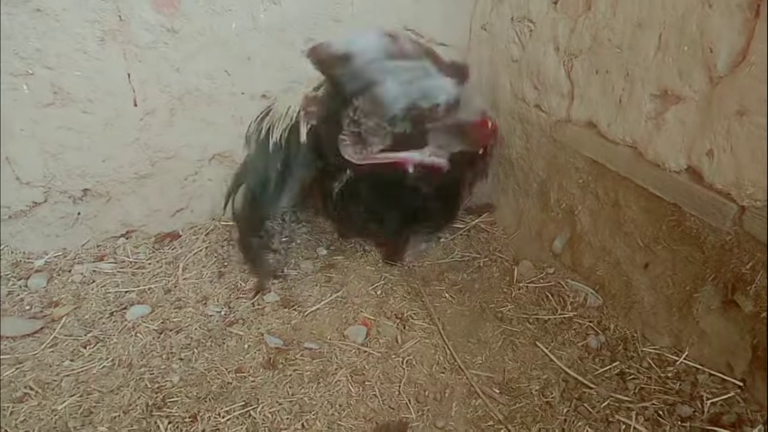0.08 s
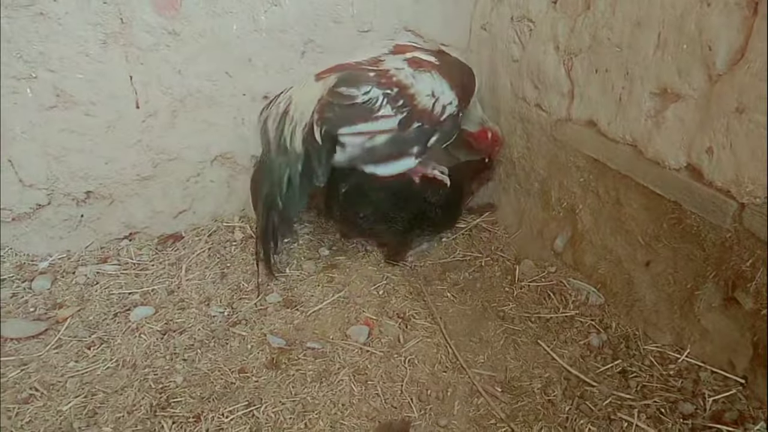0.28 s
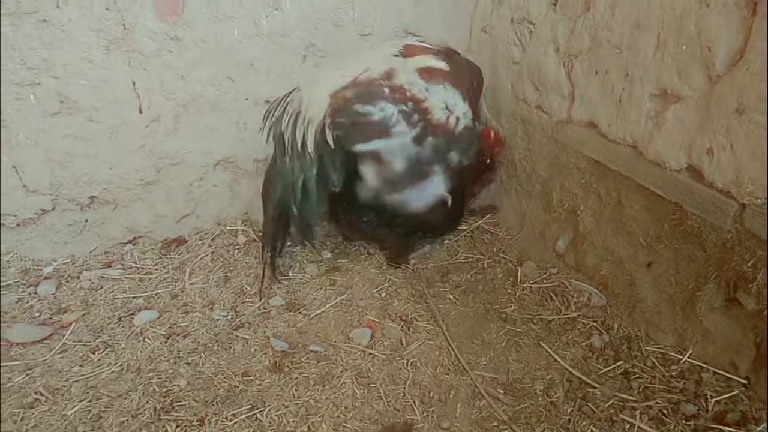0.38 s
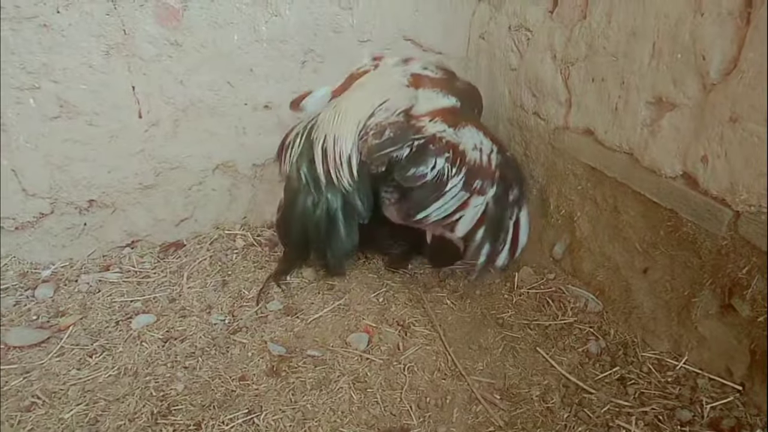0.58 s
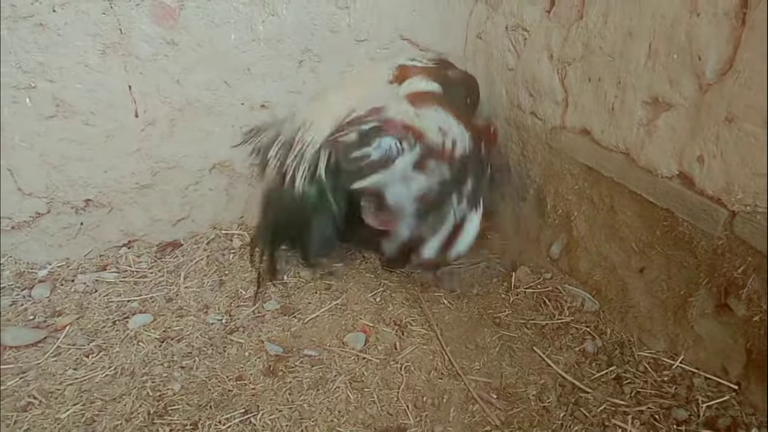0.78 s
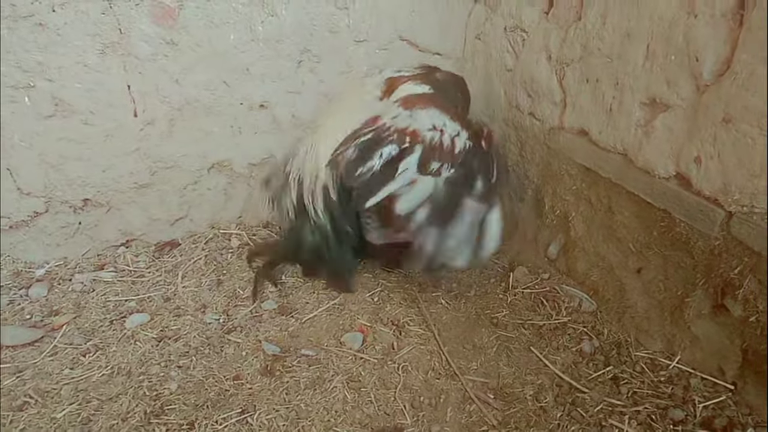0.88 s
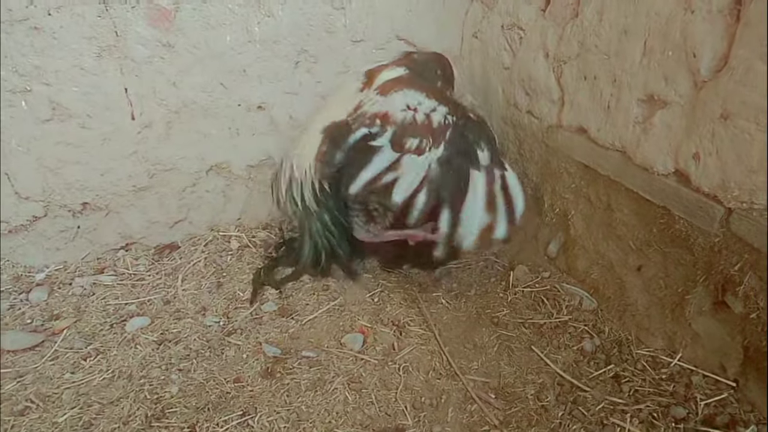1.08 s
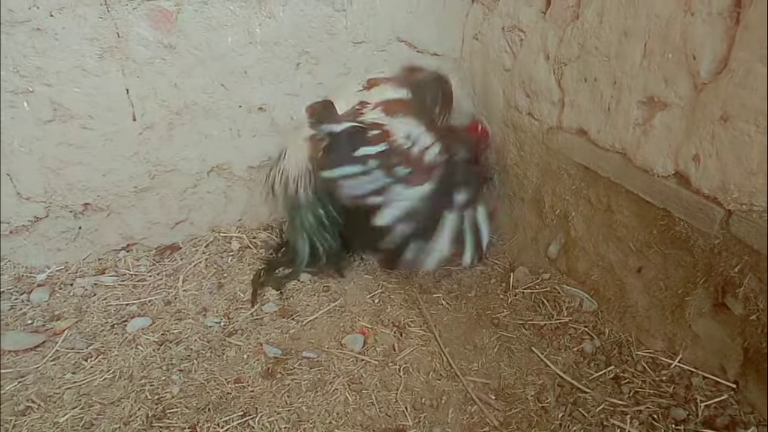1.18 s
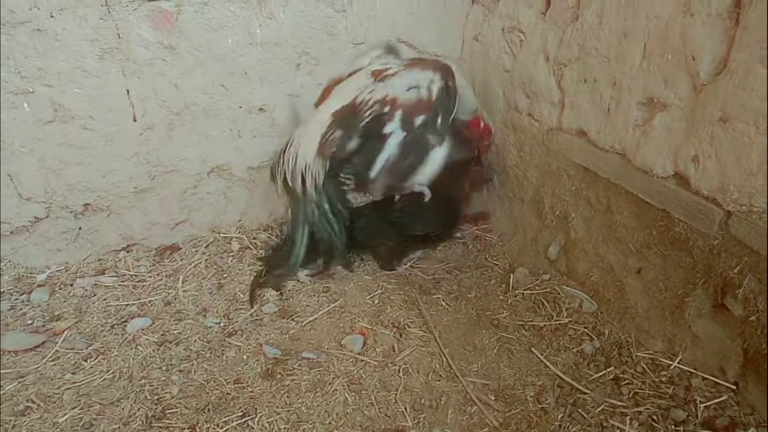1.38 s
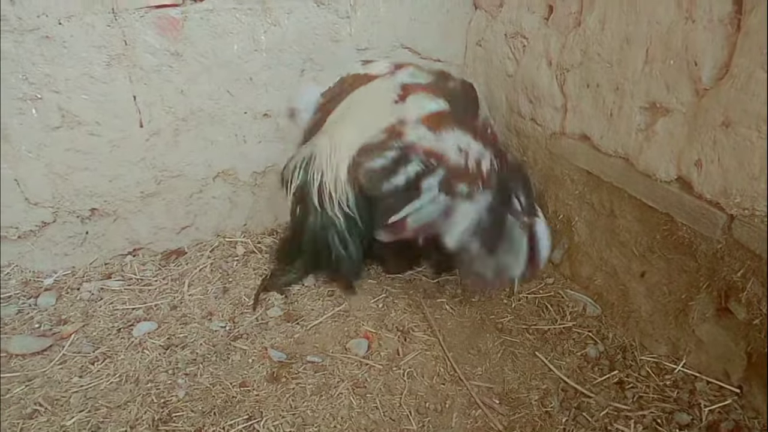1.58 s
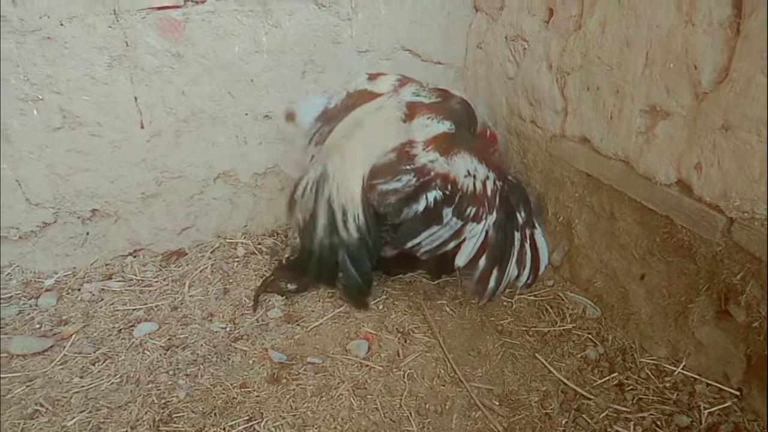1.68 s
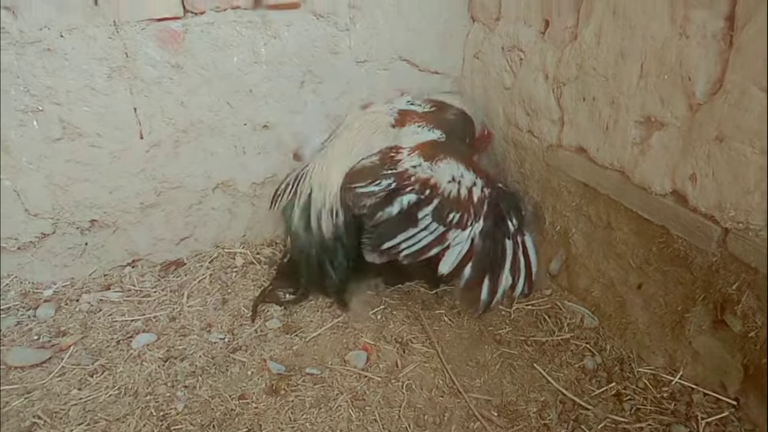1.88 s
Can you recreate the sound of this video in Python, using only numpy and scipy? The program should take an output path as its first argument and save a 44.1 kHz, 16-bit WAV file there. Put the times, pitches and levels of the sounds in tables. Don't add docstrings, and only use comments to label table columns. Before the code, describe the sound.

A rooster crows once in four loud hoarse syllables, the last sliding down, while nearby wings flap twice in soft rushes and straw ticks; faint sparrows, thin hen whines, short wall echo, small microphone.

```python
import sys
import numpy as np
from scipy import signal
from scipy.fft import rfft, irfft
from scipy.io import wavfile
from scipy.ndimage import uniform_filter1d

SR = 44100
rng = np.random.default_rng(int(sys.argv[2]) if len(sys.argv) > 2 else 0)


def generate_wav(signal):
    frames = np.transpose(np.atleast_2d(signal))
    scaled = np.clip(frames, -1, 1) * 32767
    pcm = np.round(scaled).astype(np.int16)
    wavfile.write(sys.argv[1], SR, pcm)


def how_loud(loudness_db):
    steps = np.asarray(loudness_db, float) / 20
    return 10 ** steps


N = 83790

# t/s, f/Hz, level/dB
SYLLABLE_1 = [(.185, 645, -61), (.212, 658.7, -28.5), (.244, 746, -29), (.252, 814, -26.5),
              (.3, 824.5, -25), (.33, 834, -27.5), (.36, 805.6, -24), (.4, 803.2, -31), (.45, 811, -43)]
SYLLABLE_2 = [(.525, 711.5, -40.5), (.554, 741.3, -20), (0.565, 707, -32), (0.573, 740, -33)]
SYLLABLE_2_BROKEN = [(.562, 883, -35), (0.585, 895.7, -28), (0.599, 893, -32.5), (0.616, 895.3, -28),
                     (.645, 883.3, -26.5), (0.667, 860, -36.5)]
SYLLABLE_3 = [(.68, 700, -36), (0.722, 720.8, -23.5), (0.756, 733.3, -20), (0.766, 737.4, -21.5),
              (0.78, 764, -40.5)]
SYLLABLE_3_BROKEN = [(.765, 861, -27.5), (0.781, 859.7, -26.5), (.816, 885, -27), (0.861, 890.9, -26.5),
                     (.942, 868.5, -26), (1.005, 849, -21.5), (1.03, 843.6, -30.5), (1.09, 852, -44)]
SYLLABLE_4 = [(1.18, 813, -43), (1.199, 819.3, -40), (1.241, 815, -33), (1.261, 816, -26),
              (1.299, 799.2, -27), (1.359, 788.6, -22.5),
              (1.385, 780.6, -32.5), (1.398, 717.7, -26), (1.495, 707.8, -26.5), (1.511, 670.5, -25.5),
                   (1.536, 670, -30.5), (1.55, 617.8, -33), (1.592, 604.6, -31.5), (1.604, 587, -35),
              (1.628, 572, -30.5), (1.645, 549.4, -36), (1.712, 539.4, -40.5), (1.769, 503, -47)]
# t/s, length/s, from f/Hz, to f/Hz, level/dB
SECOND_SIDE = [
    (0.246, 0.056, 762, 738, -39),
    (0.388, 0.037, 749.6, 743, -32.5),
    (0.613, 0.064, 833, 781.3, -29),
    (0.626, .055, 848, 832.7, -34.5),
    (1.159, .105, 640.6, 685, -33.5),
    (1.17, .1, 761.3, 779, -37),
]
# t/s, amount/0-1
HOARSE = [(.19, .2), (.25, .35), (.29, .35), (.315, .04), (.385, .04), (.41, .5), (.53, .2), (.57, .35),
          (.6, .2), (.64, .36), (.685, .45), (.72, .05), (.76, .25), (.8, .2), (1.0, .17), (1.07, .5),
          (1.23, .45), (1.28, .16), (1.35, .04), (1.48, .03), (1.6, .08)]
# f/Hz, width/Hz, level/dB
THROAT = [(696, 334, 5.5), (1700, 350, 3), (2320, 520, -3), (3422, 220, -2), (5260, 200, -26.5),
          (6790, 2700, -40), (9760, 1500, -43)]
# t/s, tilt/dB per octave, second resonance f/Hz, its level/dB, fourth resonance level/dB
BEAK = [(.21, -0.5, 1930, 0, -14.5), (0.24, -5, 1630, -0.5, 0), (.3, 4, 1680, 5.5, 3),
        (.375, -3, 1550, 12, 7), (.41, 0.5, 1740, -1, 3), (0.554, -6, 1550, -1.5, 8),
        (.58, 7.5, 1834, 0.5, -5.5), (.65, -2.5, 1820, -11, -4), (.699, 5.5, 1310, 5, -3),
        (0.742, -15, 1700, -3.5, 16), (.778, 3.5, 1660, -2, 1), (1.001, 1.5, 1700, -2.5, 1),
        (1.2, -0.5, 1794, 7.5, 0.5), (1.3, -1, 1606, -4.5, -2), (1.4, -5, 1520, 2, -8),
        (1.499, -4, 1900, 4.5, -5), (1.581, -2, 1705, 4, -3.5), (1.75, -7.5, 1680, -4, -16)]
# f/Hz, level/dB
HOLLOW = [(250, -40), (480, -13), (560, -7), (630, 0), (900, 0), (1020, -12), (1200, 0)]
# t/s, length/s, level/dB, tilt/dB per octave
FLAPS = [
    (.945, .14, -31.5, -2),
    (1.295, 0.068, -31, -1.2),
    (0.017, 0.033, -50, 18),
    (1.783, 0.041, -52.5, 10),
    (1.1, 0.14, -49, -3),
    (1.1, 0.14, -70, 6),
]
# f/Hz, level/dB
FEATHER = [(30, -75), (200, -24), (350, -8.5), (1100, 2.5), (2300, -5.5), (4500, -10), (6300, -17.5),
           (7200, -36), (15000, -51)]
# t/s, level/dB
HISS_LEVEL = [(0.0, -54.5), (.04, -61), (.12, -61), (.15, -71), (.2, -67), (.3, -66), (0.469, -67.5),
              (.57, -56.5), (.66, -57.5), (.69, -59.5), (.73, -54), (.87, -54.5), (.97, -57.5), (1.099, -65),
              (1.16, -58.5), (1.421, -56.5), (1.47, -65.5), (1.52, -55), (1.7, -63.5), (1.8, -73.5), (1.9, -62.5)]
# t/s, level/dB
TICKS = [(0.7333, -51), (0.859, -47), (0.951, -44), (1.491, -55), (1.6377, -53), (0.545, -56), (.6973, -50),
         (.828, -50)]
# f/Hz, level/dB
HISS_COLOUR = [(3000, -7.5), (6000, -1), (7500, -21.5), (10000, -10.5), (11500, -12.5), (14500, -3.5),
               (15700, -13.5)]
# t/s, length/s, level/dB, from f/Hz, to f/Hz, blur/0-1
CHIRPS = [
    (0, .055, -52, 385, 375, .3),
    (.058, .05, -53, 2350, 3600, .2),
    (.1, .024, -46, 3550, 4000, .6),
    (.034, .016, -45, 5500, 5400, .5),
    (1.815, .04, -57, 2400, 3100, .3),
    (1.845, .028, -52, 3150, 3400, .7),
    (1.785, .04, -55, 5900, 5400, .9),
    (1.24, .03, -47, 5600, 5200, .9),
    (1.55, .04, -52, 5300, 5000, .9),
]
# t/s, length/s, from f/Hz, to f/Hz, first partial level/dB, second partial level/dB
WHINES = [
    (1.028, .11, 1128, 1148, -49, -31),
    (1.08, .06, 1170, 1190, -49, -60),
    (1.135, .11, 1240, 1265, -41, -50),
    (.405, .07, 1250, 1180, -46, -50),
    (1.165, .09, 1145, 1155, -54, -36),
    (.25, .06, 1130, 1128, -52, -38),
    (.755, .045, 1105, 1128, -60, -34),
]
# t/s, length/s, level/dB, f/Hz
PUFFS = [
    (0.0, 0.028, -47.5, 168),
    (.03, 0.035, -70, 198),
    (.05, 0.11, -57, 121),
    (0.868, 0.037, -46, 141),
    (1.149, 0.13, -62.5, 122),
    (1.254, 0.034, -52, 295),
    (1.39, 0.15, -45.5, 175),
    (1.52, 0.17, -65, 166),
    (1.743, 0.04, -57, 71.1),
    (1.816, 0.041, -56.5, 91),
]
# f/Hz, t60/s
YARD = [(500, 0.19), (2000, 0.3), (8000, 0.3)]
# f/Hz, level/dB
FLOOR = [(18, -67), (30, 22), (361, -3), (1140, -4.5), (3180, -3.5), (3620, 5.5), (4020, -3), (7950, -79),
         (15700, -19)]


def evened(x):
    return x / np.sqrt(np.mean(x ** 2) + 1e-20)


def read(points, hz):
    f, value = np.transpose(points)
    return np.interp(np.log(hz + 1), np.log(f + 1), value)


def add(mix, s, sound):
    part = mix[max(round(s * SR), 0):][:len(sound)]
    part += sound[:len(part)]


def noise(points, count, tilt_db=0.):
    hz = np.fft.rfftfreq(count, 1 / SR)
    colour_db = read(points, hz) + tilt_db * np.log2(hz / 1000 + 0.011)
    return evened(irfft(rfft(rng.standard_normal(count)) * how_loud(colour_db), count))


def drift(count, seconds):
    size = max(int(seconds * SR), 1)
    smooth = uniform_filter1d(rng.standard_normal(count), size)
    return evened(uniform_filter1d(smooth, size))


def resonate(x, hz, width_hz):
    r = np.exp(-np.pi * width_hz / SR)
    poles = [1, -2 * r * np.cos(2 * np.pi * hz / SR), r * r]
    return signal.lfilter([(1 - r * r) / 2, 0, -(1 - r * r) / 2], poles, x)


def follow(x, hz, width_hz):
    turn = np.exp(2j * np.pi * np.cumsum(hz * np.ones(len(x))) / SR)
    r = np.exp(-np.pi * width_hz / SR)
    smooth = signal.lfilter([(1 - r) ** 2], [1, -2 * r, r * r], x / turn)
    return 2 * (turn * smooth).real


def flutter_db(t):
    since = t - .806
    rate_hz = 42 - 42 * since
    return 4.5 * np.cos(2 * np.pi * rate_hz * since) * (t > .79) * (t < .97)


def throat_shape(second_hz, second_db, fourth_db):
    shape = []
    for j, (f, width, level_db) in enumerate(THROAT):
        lift_db = second_db * (j in (1, 5)) + fourth_db * (j == 3)
        shape.append((second_hz if j == 1 else f, width, level_db + lift_db))
    return shape


def ringing(hz, turns, tilt_db, shape):
    voiced = 0
    for k in range(1, 19):
        level_db = tilt_db * np.log2(min(k, 2 + 8 / k))
        waver_db = 2 * np.sqrt(k - .8) * drift(len(hz), 0.0055)
        throat = sum(how_loud(g) / (1 + (2 * (k * hz - f) / width) ** 2) for f, width, g in shape)
        voiced = voiced + how_loud(level_db + waver_db) * np.cos(2 * np.pi * k * turns + k * k) * throat
    return voiced


def breathing(hz, turns, shape):
    breath = (0.042 + np.exp(-(turns % 1) / 0.43)) * rng.standard_normal(len(hz))
    airy = 0
    for k, (f, width, level_db) in enumerate(shape):
        centre_hz = (f + hz) / 2 if k == 0 else f
        airy = airy + (-1) ** k * how_loud(level_db) * follow(breath, centre_hz, 1.28 * width)
    return airy


def steadied(x):
    return x / np.sqrt(uniform_filter1d(x ** 2, 900) + 1e-9)


def syllable(rows):
    s, hz, db = np.transpose(rows)
    t = np.arange(s[0], s[-1], 1 / SR)
    hz = uniform_filter1d(np.interp(t, s, hz), 90)
    db = uniform_filter1d(np.interp(t, s, db), 90) + flutter_db(t)
    when, *beak = np.transpose(BEAK)
    tilt_db, second_hz, second_db, fourth_db = (np.interp(t, when, v) for v in beak)
    shape = throat_shape(second_hz, second_db, fourth_db)
    rough = np.interp(t, *np.transpose(HOARSE))
    jitter = 0.039 * (rough + 0.027) * drift(len(t), .004)
    turns = np.cumsum(hz * (1 + jitter)) / SR
    half_pitch = 1 + 0.1 * rough * np.cos(np.pi * turns)
    voiced = steadied(ringing(hz, turns, tilt_db, shape) * half_pitch)
    airy = steadied(breathing(hz, turns, shape))
    edge = np.minimum(1, np.minimum(t - s[0], s[-1] - t) / 0.003)
    voice_share = np.sqrt(np.clip(1 - 1.6 * rough ** 2, 0, 1))
    return s[0], edge * how_loud(db) * (voice_share * voiced + 0.9 * rough * airy)


def second_side(start, length, from_hz, to_hz, db):
    swell = ((0, -10), (.3, 3.5), (.7, 1), (1, -5))
    return syllable([(start + length * u, from_hz + (to_hz - from_hz) * u, db + g) for u, g in swell])


def swallowed(x):
    hz = np.fft.rfftfreq(len(x), 1 / SR)
    return irfft(rfft(x) * how_loud(read(HOLLOW, hz)), len(x))


def flap(start, length, db, tilt_db):
    u = np.arange(0, 1, 1 / (length * SR))
    flutter = how_loud(db + 2.5 * drift(len(u), 0.0017))
    return start, flutter * np.sin(np.pi * u ** 0.73) * noise(FEATHER, len(u), tilt_db)


def hiss_and_ticks():
    hiss_db = np.interp(np.arange(N) / SR, *np.transpose(HISS_LEVEL))
    out = how_loud(hiss_db + 1.5 + 2.0 * drift(N, 0.0016)) * noise(HISS_COLOUR, N)
    t = np.arange(400) / SR
    for s, db in TICKS:
        decay = how_loud(db + 1.5 - 60 * t / 0.0054)
        add(out, s, decay * noise(HISS_COLOUR, 400, 3.5))
    return out


def chirp(start, length, db, from_hz, to_hz, blur):
    u = np.arange(0, 1, 1 / (length * SR))
    turns = np.cumsum(from_hz * (to_hz / from_hz) ** u) / SR
    shake = 1 - blur + blur * drift(len(u), .0016)
    swell = how_loud(db + 10 * (1 - blur) * (u - 0.5)) * np.sin(np.pi * u) ** 0.34
    return start, swell * shake * np.sin(2 * np.pi * turns)


def whine(start, length, from_hz, to_hz, first_db, second_db):
    u = np.arange(0, 1, 1 / (length * SR))
    glide_hz = from_hz + (to_hz - from_hz) * u
    turns = np.cumsum(glide_hz * (1 + 0.02 * drift(len(u), 0.0026))) / SR
    tone = 0
    for k, level_db in ((1, first_db), (2, second_db)):
        tone = tone + how_loud(level_db + 3.8 * drift(len(u), 0.0057)) * np.cos(2 * np.pi * k * turns)
    return start, 1.4 * np.sin(np.pi * u ** 0.45) * tone


def puff(start, length, db, hz):
    u = np.arange(0, 1, 1 / (length * SR))
    low = resonate(rng.standard_normal(len(u)), hz, 1.17 * hz)
    low = resonate(low, hz, 1.17 * hz)
    return start, how_loud(db) * np.sin(np.pi * u ** .5) * evened(low)


def yard(x):
    at = np.arange(300, SR // 2 - 20, 20)
    taps = np.zeros(SR // 2)
    taps[at + rng.integers(0, 20, len(at))] = rng.choice([-1., 1.], len(at))
    hz, t, z = signal.stft(taps, SR, nperseg=256)
    decay = how_loud(-60 * t / read(YARD, hz)[:, None])
    tail = signal.istft(z * decay, SR, nperseg=256)[1]
    return signal.fftconvolve(x, tail / np.linalg.norm(tail))[:N]


def scene():
    far, near = np.zeros(N), np.zeros(N)
    syllable_4 = SYLLABLE_4
    for rows in (SYLLABLE_1, SYLLABLE_2, SYLLABLE_2_BROKEN, SYLLABLE_3, SYLLABLE_3_BROKEN, syllable_4):
        add(far, *syllable(rows))
    for source, rows in ((second_side, SECOND_SIDE), (whine, WHINES)):
        for row in rows:
            add(far, *source(*row))
    far = swallowed(far)
    for source, rows in ((chirp, CHIRPS), (flap, FLAPS), (puff, PUFFS)):
        for row in rows:
            add(near, *source(*row))
    echo = how_loud(-6.5) * yard(far + 0.8 * near)
    background = how_loud(-64) * noise(FLOOR, N)
    return (how_loud(-3.0) * far + echo + near + hiss_and_ticks() + background)[None]


def top_cut(x):
    return signal.sosfilt(signal.butter(12, 16630, fs=SR, output="sos"), x)


def record(dry):
    low_cut = signal.butter(4, 58.7, "high", fs=SR, output="sos")
    mix = signal.sosfilt(low_cut, dry)
    return top_cut(mix)


dry = scene()
out = record(dry)
generate_wav(out)
```